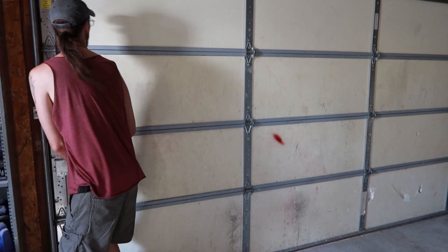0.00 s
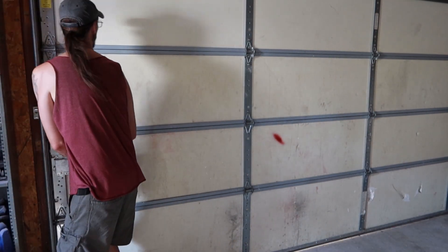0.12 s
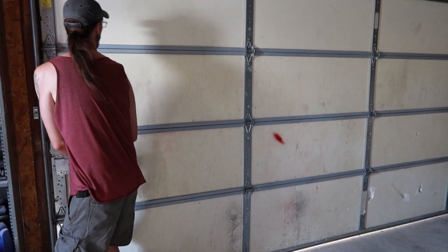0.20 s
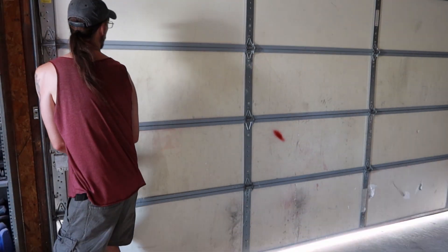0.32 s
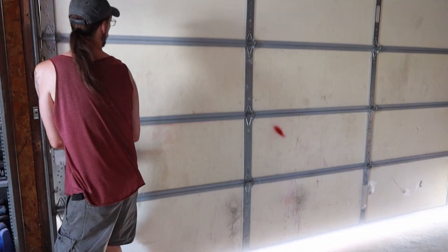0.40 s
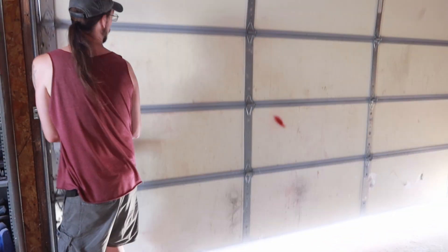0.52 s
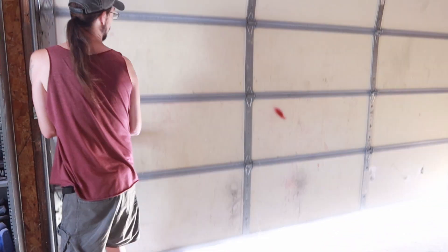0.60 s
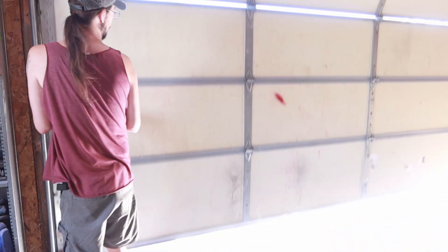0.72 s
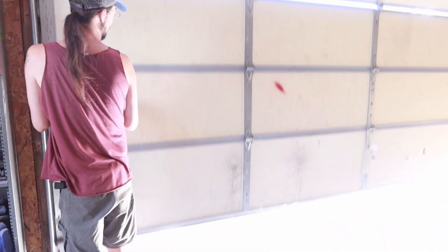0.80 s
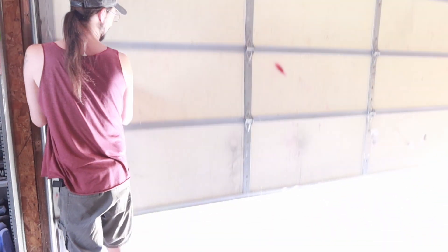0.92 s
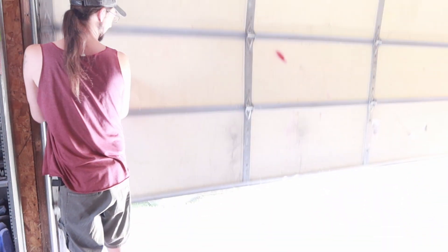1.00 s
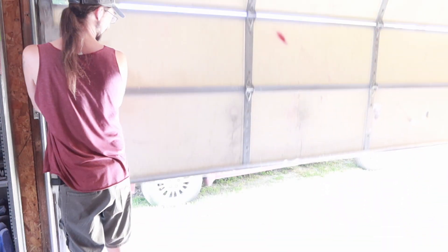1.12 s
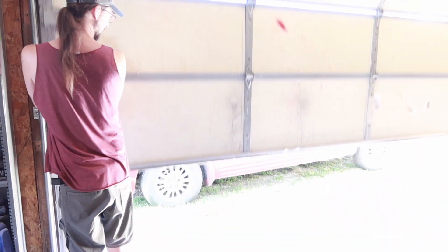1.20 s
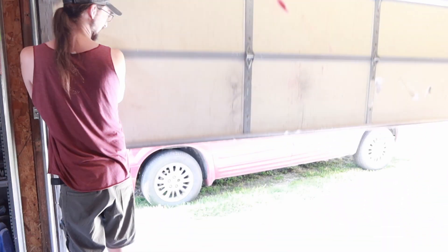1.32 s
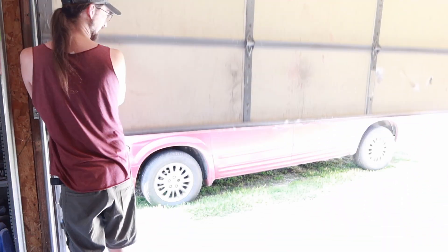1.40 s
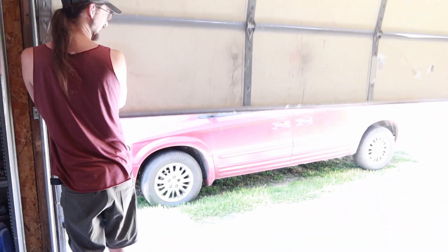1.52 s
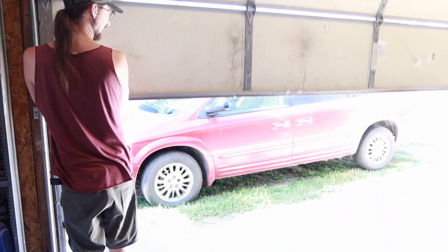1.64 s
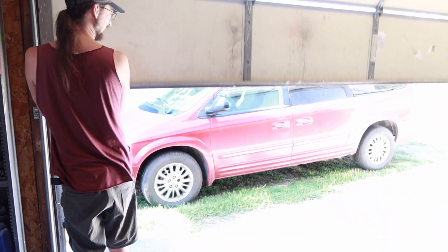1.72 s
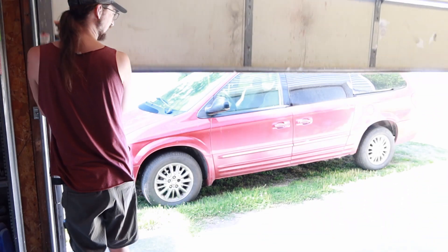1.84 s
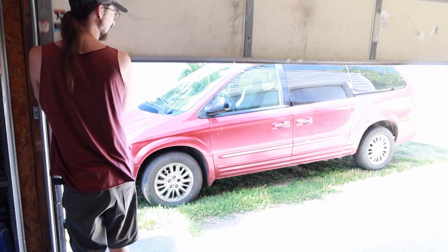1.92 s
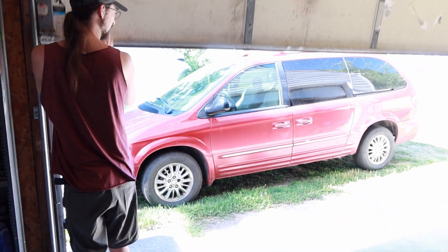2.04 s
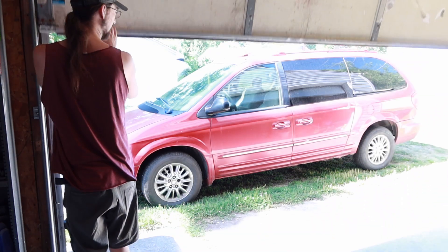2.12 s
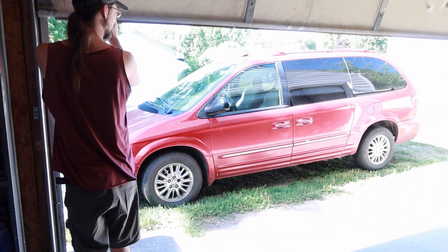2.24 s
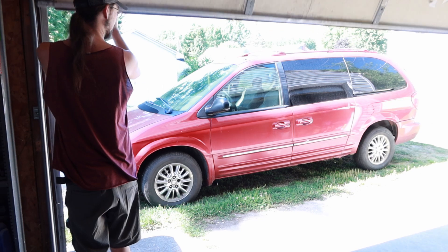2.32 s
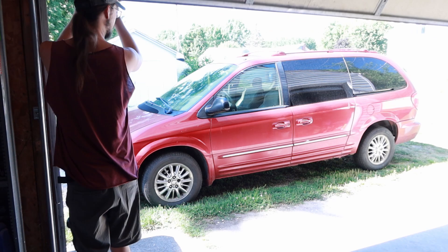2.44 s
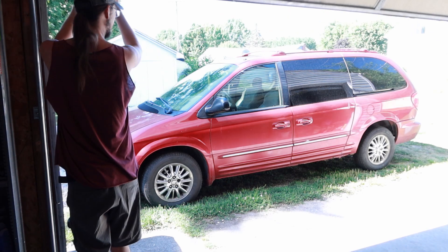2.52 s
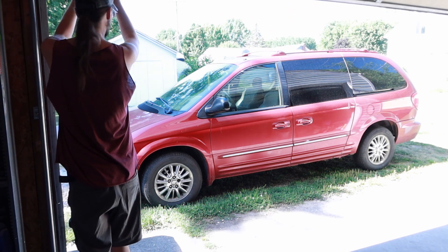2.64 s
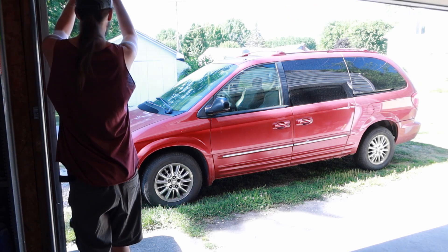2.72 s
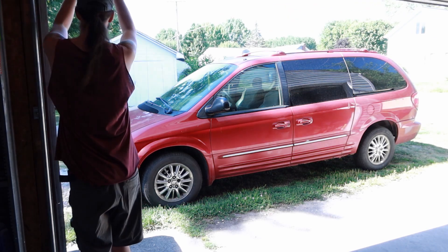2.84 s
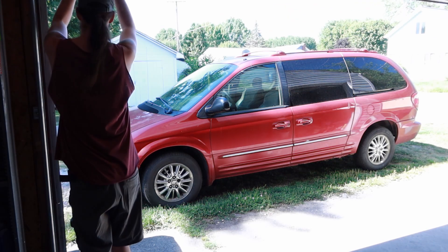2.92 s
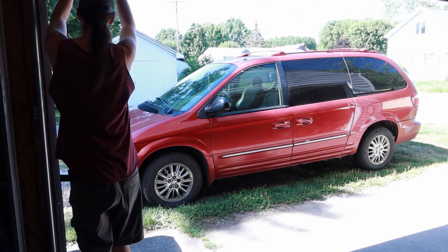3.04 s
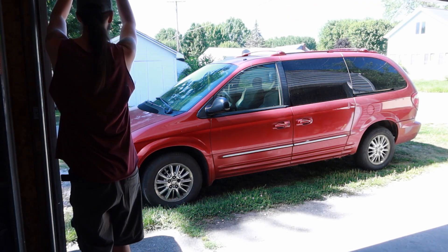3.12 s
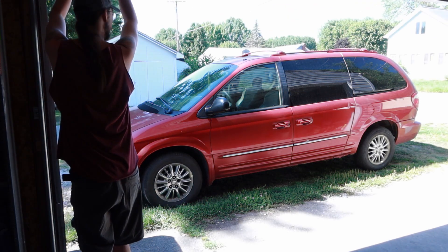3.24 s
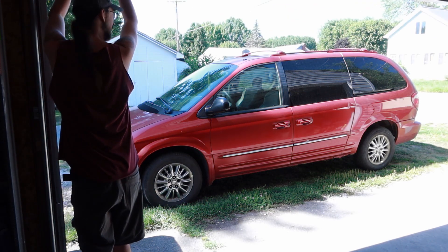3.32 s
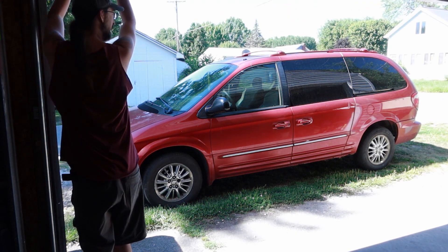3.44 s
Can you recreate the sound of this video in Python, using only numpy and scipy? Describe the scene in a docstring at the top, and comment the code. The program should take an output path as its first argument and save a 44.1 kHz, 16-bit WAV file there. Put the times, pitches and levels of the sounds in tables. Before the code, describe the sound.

A garage door rattles faintly, its latch scrapes, then it is heaved up with a loud clatter of rollers, clanking hinges and booming panels, calming at the end; close stereo microphone in an echoing bare garage.

```python
"""A faint rattle and a short latch scrape, then a garage door is heaved up by hand with a loud clatter.
Rollers and panels are shaking noise; loose hinges chatter as noise that rings the steel tracks.
Hinges clank as sections tip into the bend: noise bursts with ringing tones. Bumps boom as low tones.
Squeaks are thin gliding whistles, and fittings tick. The noise calms down as the door settles.
Bare garage walls add an echoing tail, over quiet outdoor air heard by two close microphone ports."""
import sys
import numpy as np
from scipy import signal
from scipy.fft import rfft, irfft
from scipy.io import wavfile

SR = 44100
rng = np.random.default_rng(int(sys.argv[2]) if len(sys.argv) > 2 else 0)


def master_out(mix):
    """Clip the mix to full scale and print it as 16-bit PCM to the path in sys.argv[1]."""
    frames = np.transpose(np.atleast_2d(mix))
    ceiling = np.clip(frames, -1, 1)
    pcm = np.round(ceiling * 32767).astype(np.int16)
    wavfile.write(sys.argv[1], SR, pcm)


N = 154350  # length in samples: 3.5 s
RING = SR // 2  # longest ring or room tail in samples: half a second

# All levels are relative: each layer is also scaled where it is mixed. fade_s is the time to fall 60 dB.
# rollers running in the tracks: time_s, level_db
ROLLING_LEVEL = [(0, -35.5), (.17, -45), (.28, -34), (.37, -40.5), (.47, -30), (.51, -19), (.78, -21),
                 (1.12, -18.5), (1.24, -22.5), (1.41, -23), (1.73, -22.5), (1.92, -23), (2.12, -25.5),
                 (2.65, -25), (3.05, -32.5), (3.39, -33.5), (3.46, -48.5)]
# panels shaking: time_s, level_db
SHAKING_LEVEL = [(0, -39.5), (.16, -43), (.28, -33), (.38, -42.5), (.47, -33), (.52, -24), (.83, -21),
                 (.97, -28.5), (1.11, -24), (1.5, -27), (2.1, -30.5), (2.65, -29), (3.1, -33.5),
                 (3.4, -36.5), (3.5, -65)]
# loose hinges chattering: time_s, level_db
CHATTER_LEVEL = [(0, -48), (.38, -62), (.47, -39), (.51, -22.5), (.68, -26.5), (.92, -19.5), (1.02, -25.5),
                 (1.12, -23), (1.3, -28.5), (1.42, -21.5), (1.51, -32), (1.61, -25.5), (1.75, -32),
                 (1.92, -24.5), (2.05, -37), (2.85, -35), (3.03, -47), (3.3, -46), (3.45, -68)]
# a section humming as it rolls overhead: time_s, level_db
HUM_LEVEL = [(.85, -42), (1.15, -30.5), (2.2, -47), (3.15, -36.5), (3.5, -61)]
# latch and rollers knocking against the track: start_s, level_db
TRACK_KNOCKS = [(.193, 0), (0.2137, 1.5), (.218, 7.5), (0.4002, -3), (.498, 7.5), (.517, 10.5),
                (1.116, 11.5), (1.378, 12.5), (1.556, 9), (1.79, 10.5), (1.809, 10), (1.915, 6), (2.195, 5),
                (2.485, 2), (2.964, 0)]
# booms of a section as the door bumps: start_s, level_db, pitch_hz
SECTION_BUMPS = [(0.047, -11, 393), (0.516, 5.5, 165), (0.658, 8, 190.5), (.772, 4.5, 258),
                 (0.823, 7.5, 334.5), (1.035, 9.5, 160.6), (1.10, 6.5, 143), (1.235, 7.5, 171.6),
                 (2.385, 3.5, 215), (2.66, 0.5, 313), (3.144, 3, 288), (3.187, 1, 234)]
# small ticks of cable and fittings: start_s, level_db
FITTING_TICKS = [(.434, -5), (0.49, 6.5), (2.172, 0.5), (2.225, -2), (2.2877, 1.5), (2.383, -3),
                 (2.4815, 2), (2.594, 4.5), (2.943, -2.5), (3.048, -4.5), (3.1184, -6), (3.201, -1),
                 (3.253, -11)]
# squeaks and creaks of rollers and hinges: start_s, length_s, pitch_hz (at the start), level_db
SQUEAK_EVENTS = [(0.259, .04, 1600, -29.5), (0.395, 0.027, 3490, -37), (1.96, .09, 4080, -37),
                 (2.033, .085, 4835, -33.5), (2.279, 0.042, 1290, -25.5), (2.681, 0.11, 3885, -23.5),
                 (2.753, 0.024, 1380, -25.5), (2.783, 0.065, 3725, -37), (2.968, 0.016, 1306, -22.5)]
# hinge clanks: start_s, level_db, fade_s (of the clatter), pitch_hz (of that hinge)
HINGE_CLANKS = [(0.5446, 10, 0.043, 4400), (.848, 7.5, 0.21, 2190), (0.8713, 11, .065, 4340),
                (0.9496, -4, 0.032, 6140), (1.0744, 4.5, 0.12, 5070), (1.0994, 4, 0.085, 4950),
                (1.3289, 10.5, 0.09, 4820), (1.371, 0.5, .1, 3900), (1.4182, 0.5, 0.13, 2630),
                (1.5561, 2, 0.29, 3870), (1.869, -3, 0.069, 4570)]
# ringing tones of tracks and brackets: pitch_hz (before detuning), level_db, fade_s
STEEL_TONES = [(1571, 0, .25), (2098, 3, .15), (2445, -3, .13), (2702, -3, .13), (3047, -2, .11),
               (3871, -1, .08), (5040, 2, .07), (5950, -3, .1), (6347, -3, .08)]
# ringing tones of the panels: pitch_hz, level_db, fade_s
PANEL_TONES = [(75.8, 2, 0.31), (96.8, 0, 0.26), (194.3, -5, .2)]
# ringing tones of a booming section: multiple of the bump's pitch (no unit), level_db, fade_s
SECTION_TONES = [(1, 0, .2), (1.3, -5, .13), (1.9, -10, .1)]
# tone colour of running rollers: frequency_hz, level_db
ROLLING_COLOUR = [(100, -7), (300, 0.5), (780, 0), (960, -1.5), (1350, 0.5), (2050, -3), (2500, -9),
                  (4000, -16.5), (7000, -36.5), (9000, -20), (15000, -35)]
# tone colour of shaking panels: frequency_hz, level_db
SHAKING_COLOUR = [(15, -15), (30, -10), (48, -2), (60, -12), (80, -6), (165, 1.5), (350, -3), (550, -11),
                  (1200, -26), (5000, -63)]
# tone colour of chattering and clanking hinges: frequency_hz, level_db
HINGE_COLOUR = [(300, -33), (1200, -7), (2400, 1.5), (3600, 0.5), (5000, -1), (6800, -1), (8000, -8),
                (9600, -9), (11000, -4.5), (12200, -7.5), (14000, -9.5), (16000, -17)]
# tone colour of track knocks: frequency_hz, level_db
TRACK_KNOCK_COLOUR = [(50, -9), (200, -13.5), (750, -0.5), (1000, -3.5), (1400, -2), (2500, -7),
                      (6000, -15.5), (9000, -32), (16000, -60)]
# tone colour of ticks: frequency_hz, level_db
FITTING_COLOUR = [(300, -23), (1500, 12), (4000, 2.5), (6800, 8), (8500, 1), (11000, 5.5), (15000, 3)]
# tone colour of the latch scrape: frequency_hz, level_db
LATCH_COLOUR = [(300, -27), (1700, -9), (3000, -11), (6800, -15.0), (9000, -16), (15000, -37)]
# tone colour of outdoor air: frequency_hz, level_db
AIR_COLOUR = [(20, -1), (90, 6.5), (200, -6.5), (600, -3), (2000, -20), (7000, -21.5), (16000, -78)]
# the two ports: frequency_hz, left_lead_rad, unshared_db, left_minus_right_db
PORT_DIFFERENCES = [(150, 0, -42, 0), (350, 0, -26, 0), (750, .02, -25, .1), (1400, .05, -19, .5),
                    (3200, .14, -11, .6), (5000, .5, -7.5, 1.1), (7300, .8, -7, 1.1), (8000, 2.5, -9, .6),
                    (9300, 2.5, -11, .3), (10700, 3.1, -15, 0), (15000, 2.75, -11, 0)]

# room echo against the direct sound
RUN_ROOM_DB = -7.5  # for running rollers, panels and squeaks
CLANK_ROOM_DB = -8  # for clanks
KNOCK_ROOM_DB = -2  # for knocks, latch, hinge chatter and ticks


def undb(db):
    """Turn decibels into a multiplier."""
    return 10 ** (np.asarray(db) / 20)


def curve(rows):
    """Draw a changing loudness through (time_s, level_db) points."""
    return undb(np.interp(np.arange(N) / SR, *np.array(rows).T))


def per_bin(rows, size, axis=1):
    """Spread one column of a table by frequency over every step of a spectrum."""
    rows = np.array(rows, float)
    bin_hz = np.arange(size // 2 + 1) * SR / size
    return np.interp(np.log(bin_hz + 1), np.log(rows[:, 0]), rows[:, axis])


def through(x, response):
    """Let a sound set a response ringing (convolution), keeping the length."""
    return signal.fftconvolve(np.atleast_2d(x), np.atleast_2d(response), axes=1)[:, :x.shape[-1]]


def unit(x):
    """Scale each channel to a total energy of 1."""
    return x / np.sqrt(np.sum(x ** 2, axis=-1, keepdims=True))


def steady(x):
    """Scale to an average (rms) level of 1."""
    return x / np.sqrt(np.mean(x ** 2))


def colour(x, points):
    """Filter a sound through (frequency_hz, level_db) points, with nothing heard ahead of its cause."""
    size = 4096
    cepstrum = irfft(np.log(undb(per_bin(points, size))))
    # folding the second half onto the first makes the filter respond without delay
    cepstrum[1:size // 2] *= 2
    cepstrum[size // 2 + 1:] = 0
    response = irfft(np.exp(rfft(cepstrum)))
    return through(x, unit(response))


def fade(fade_s):
    """Half a second of smooth dying away, dropping 60 dB every fade_s seconds."""
    return np.exp(-np.log(1000) * np.arange(RING) / SR / fade_s)


def burst(fade_s):
    """The dense, fast-dying ring of sheet metal: fading noise, unrelated in the two channels."""
    length = RING // 2
    return unit(rng.standard_normal((2, length)) * fade(fade_s)[:length])


def modes(table, tuning=1):
    """An object's ringing tones, each with its own random phase in each channel."""
    t = np.arange(RING) / SR
    ring = 0
    for hz, db, fade_s in table:
        cycles = tuning * hz * t + rng.random((2, 1))
        ring = ring + undb(db) * fade(fade_s) * np.sin(2 * np.pi * cycles)
    return unit(ring)


def place(rows):
    """Lay out (start_s, level_db, sound) rows in time."""
    out = np.zeros((2, N + RING))
    for start_s, db, sound in rows:
        i = int(start_s * SR)
        out[:, i:i + sound.shape[1]] += undb(db) * sound
    return out[:, :N]


def blows(rows):
    """A short metal burst for each (start_s, level_db, fade_s) row."""
    return place([(start_s, db, burst(fade_s)) for start_s, db, fade_s in rows])


def rattle(per_s, spread_db, fade_s):
    """Many random tiny impacts of uneven strength: noise whose power jumps and then dies away."""
    strength = undb(spread_db * np.minimum(rng.standard_normal(N), 2))
    power = (rng.random(N) < per_s / SR) * strength ** 2
    keep_per_sample = np.exp(-2 * np.log(1000) / SR / fade_s)
    ringing = signal.lfilter([1], [1, -keep_per_sample], power)
    return steady(np.sqrt(ringing) * rng.standard_normal((2, N)))


def walk(rate):
    """Smooth random wander, with a new random target `rate` times a second."""
    return np.interp(np.arange(N) / SR * rate, np.arange(N), rng.standard_normal(N))


def garage(x, wet_db):
    """Bare walls return a dense echo, a moment late, whose treble dies a little sooner."""
    split_hz, low_fade_s, high_fade_s, gap_s = 2500, .57, .5, .0065

    def noise_band(kind):
        """Random echoes below or above the split."""
        sos = signal.butter(2, split_hz, kind, fs=SR, output="sos")
        return signal.sosfilt(sos, rng.standard_normal((2, RING)))

    echoes = noise_band("low") * fade(low_fade_s) + noise_band("high") * fade(high_fade_s)
    tail = unit(echoes * (np.arange(RING) / SR > gap_s))
    return (x + undb(wet_db) * through(x, tail)) / np.hypot(1, undb(wet_db))


def outdoor_air():
    """Quiet air outside: steady noise with a soft, low colour."""
    return undb(-44.5) * colour(rng.standard_normal((2, N)), AIR_COLOUR)


def rollers():
    """Rollers clatter along the track as many tiny impacts, and knock at its joints."""
    run = rattle(per_s=600, spread_db=2.5, fade_s=.088) * curve(ROLLING_LEVEL)
    run = garage(run, RUN_ROOM_DB)
    knock_fade_s = .16
    knocks = blows([(start_s, db, knock_fade_s) for start_s, db in TRACK_KNOCKS])
    knocks = garage(knocks, KNOCK_ROOM_DB)
    return undb(-1.0) * colour(run, ROLLING_COLOUR) + colour(knocks, TRACK_KNOCK_COLOUR)


def panels():
    """The big panels drum as they are jolted, hum as they roll, and boom when the door bumps."""
    jolts = rattle(per_s=200, spread_db=1.5, fade_s=.058) * curve(SHAKING_LEVEL)
    rumble = undb(-3.5) * colour(jolts, SHAKING_COLOUR)
    drumming = undb(-9) * through(jolts, modes(PANEL_TONES))
    hum_hz, hum_fade_s = 148, .5
    hum = through(rng.standard_normal((2, N)), modes([(hum_hz, 0, hum_fade_s)]))
    hum = steady(hum) * curve(HUM_LEVEL)
    booms = place([(start_s, db, modes(SECTION_TONES, hz)) for start_s, db, hz in SECTION_BUMPS])
    return rumble + drumming + hum + booms


def hinges(count=5):
    """Loose hinges chatter and ring, each tuned a little differently; cable and fittings tick."""
    detune = .05  # typical share of the pitch
    chatter, jingle = 0, 0
    for _ in range(count):
        hinge = rattle(per_s=55, spread_db=4.5, fade_s=.04) * curve(CHATTER_LEVEL) / np.sqrt(count)
        chatter = chatter + hinge
        jingle = jingle + through(hinge, modes(STEEL_TONES, 1 + detune * rng.standard_normal()))
    tick_fade_s = .11
    ticks = blows([(start_s, db, tick_fade_s) for start_s, db in FITTING_TICKS])
    ticks = colour(ticks, FITTING_COLOUR)
    return undb(1.5) * colour(chatter, HINGE_COLOUR) + undb(-13.5) * jingle + ticks


def latch():
    """The latch slides with a brief scrape before the lift: one fading burst of noise."""
    start_s, scrape_db, scrape_fade_s = .1082, -3, .3
    return colour(blows([(start_s, scrape_db, scrape_fade_s)]), LATCH_COLOUR)


def squeaks():
    """Dry rollers and hinges stick and slip: thin whistles that swell, sag in pitch and fade."""
    sag_hz_per_s, octave_db = 600, -17.5
    roughness, wander_per_s = .0035, 300  # share of the pitch, and how often it changes
    t, out = np.arange(N) / SR, 0
    for start_s, length_s, hz, db in SQUEAK_EVENTS:
        age = np.clip(t - start_s, 0, length_s)
        pitch_hz = (hz - sag_hz_per_s * age) * (1 + roughness * walk(wander_per_s))
        phase = 2 * np.pi * np.cumsum(pitch_hz) / SR
        swell = np.interp(age / length_s, [0, .33, 1], [0, 1, 0])
        whistle = np.sin(phase) + undb(octave_db) * np.sin(2 * phase)
        out = out + undb(db) * swell * whistle
    return out * undb(3.5)


def clanks():
    """As a section tips, its hinge cracks, rings at its own pitch and sets the tracks ringing."""
    ring_db, ring_fade_s = -2, .07  # added to the level_db of each clank
    cracks = blows([(start_s, db, fade_s) for start_s, db, fade_s, hz in HINGE_CLANKS])
    rings = place([(start_s, db + ring_db, modes([(hz, 0, ring_fade_s)]))
                   for start_s, db, fade_s, hz in HINGE_CLANKS])
    track_ring = undb(-1.5) * through(cracks, modes(STEEL_TONES))
    return undb(4.5) * colour(cracks, HINGE_COLOUR) + track_ring + rings


def ports(x):
    """Two close ports share the bass; the treble differs and leads in phase at the left one."""
    lead, apart_db, left_db = (per_bin(PORT_DIFFERENCES, N, axis=k) for k in (1, 2, 3))
    shared, own = rfft(x)
    sign = np.array([[1], [-1]])  # left, right
    apart = undb(apart_db)
    pair = (shared + sign * apart * own) / np.hypot(1, apart)
    # split the level and phase differences evenly between the two sides
    return irfft(pair * undb(sign * left_db / 2) * np.exp(sign * 1j * lead / 2), N)


def scene():
    """The door in the garage, over quiet outdoor air."""
    door = rollers()  # already has its room echo
    door = door + garage(panels() + squeaks(), RUN_ROOM_DB)
    door = door + garage(latch() + hinges(), KNOCK_ROOM_DB)
    door = door + garage(clanks(), CLANK_ROOM_DB)
    return ports(door + outdoor_air())


def record(dry):
    """Round off the highest peaks, then cut the top of the treble."""
    top_hz = 15500
    rounded = dry / (1 + dry ** 4) ** .25
    return signal.sosfilt(signal.ellip(10, .2, 80, top_hz, fs=SR, output="sos"), rounded)


dry = scene()
out = record(dry)
master_out(out)
```